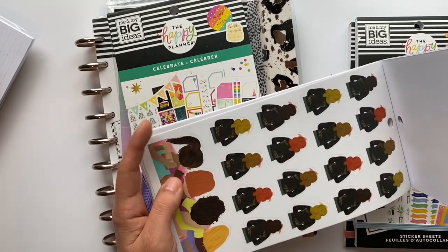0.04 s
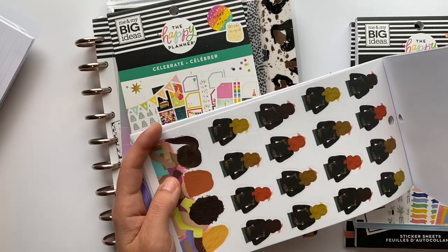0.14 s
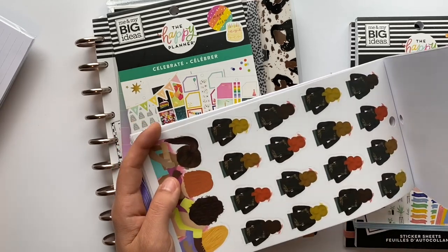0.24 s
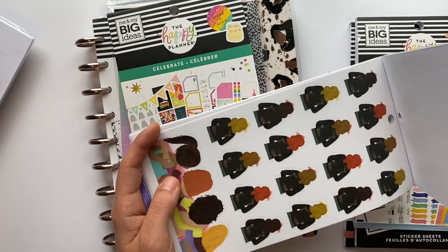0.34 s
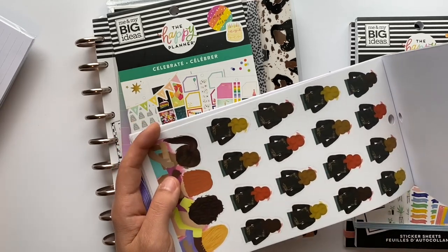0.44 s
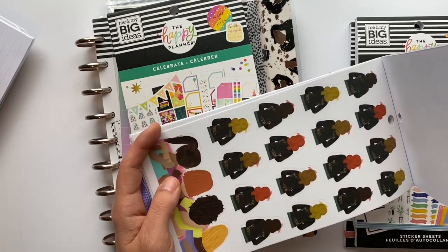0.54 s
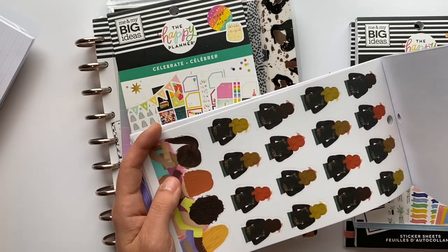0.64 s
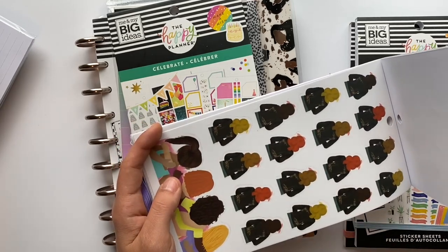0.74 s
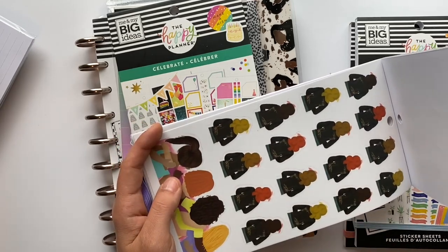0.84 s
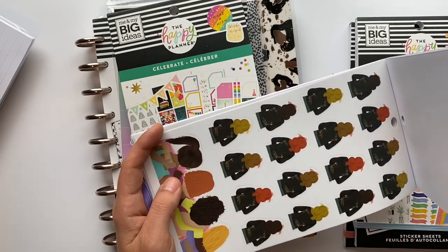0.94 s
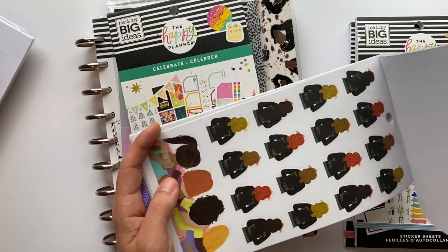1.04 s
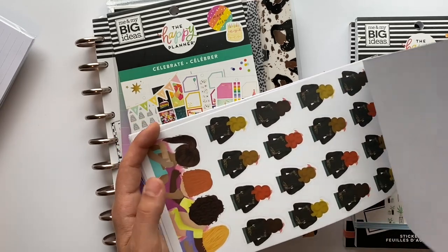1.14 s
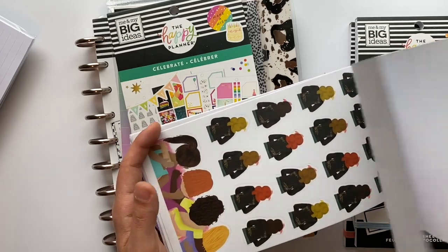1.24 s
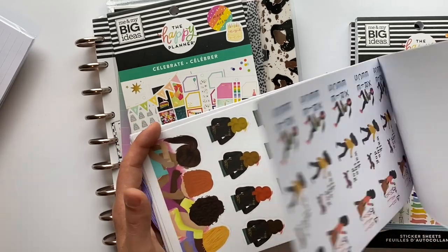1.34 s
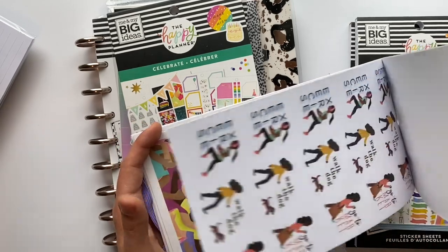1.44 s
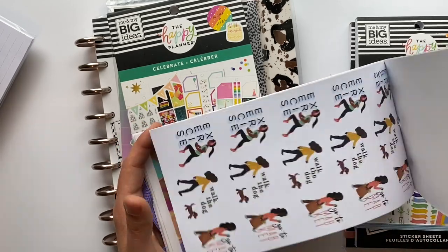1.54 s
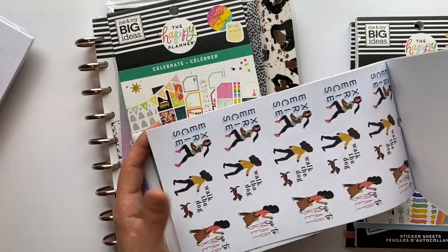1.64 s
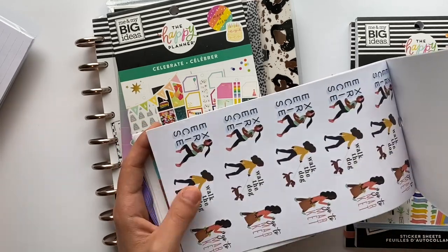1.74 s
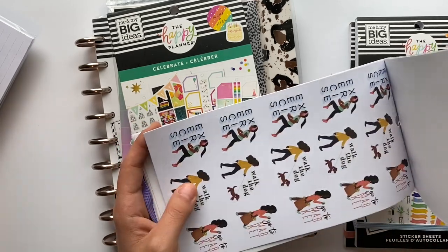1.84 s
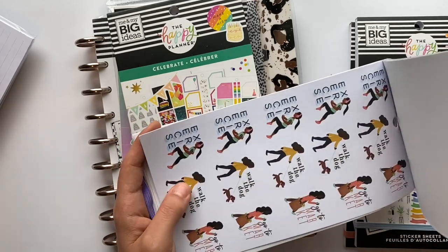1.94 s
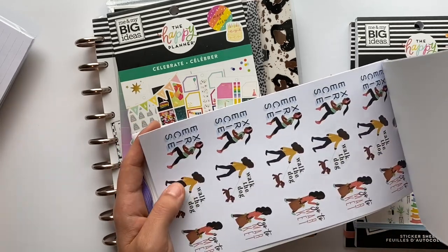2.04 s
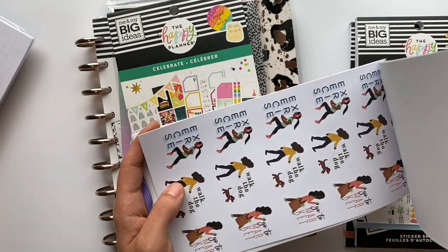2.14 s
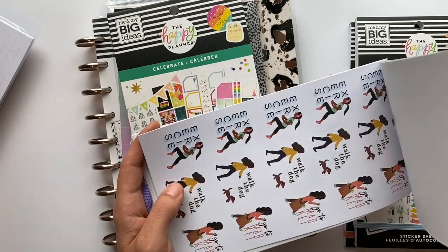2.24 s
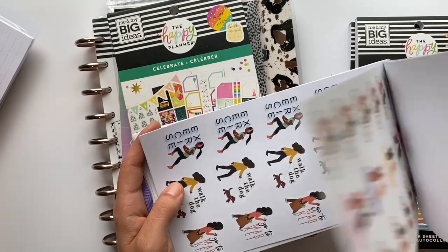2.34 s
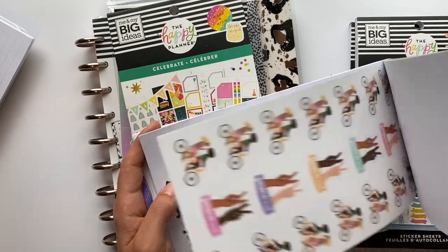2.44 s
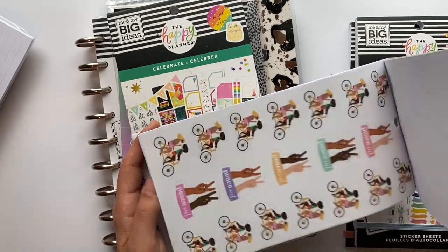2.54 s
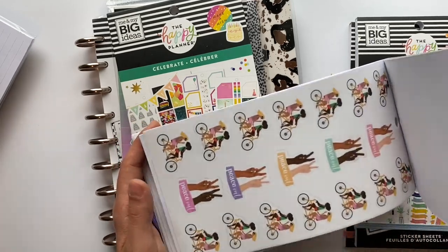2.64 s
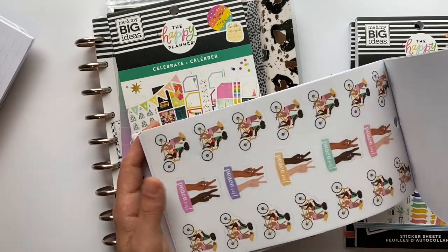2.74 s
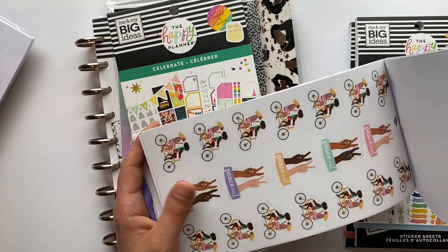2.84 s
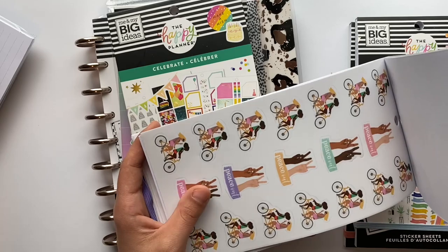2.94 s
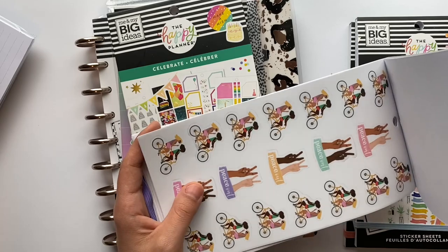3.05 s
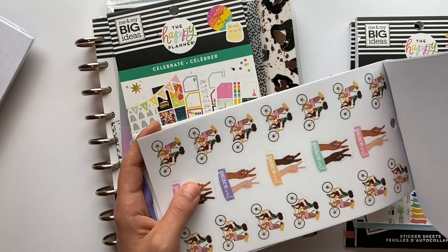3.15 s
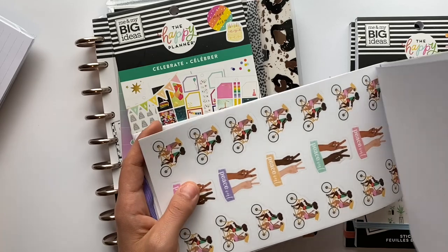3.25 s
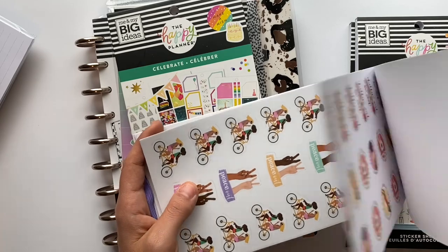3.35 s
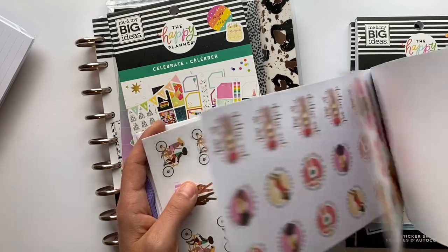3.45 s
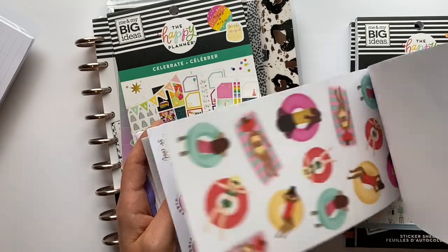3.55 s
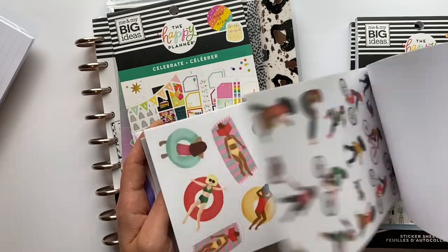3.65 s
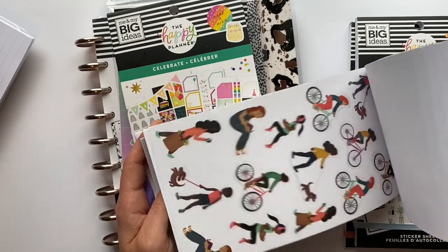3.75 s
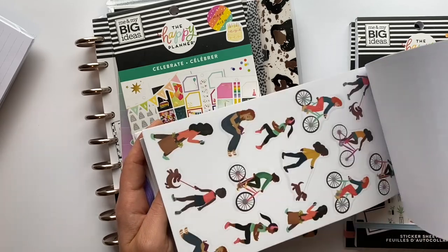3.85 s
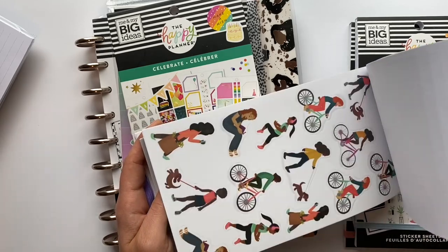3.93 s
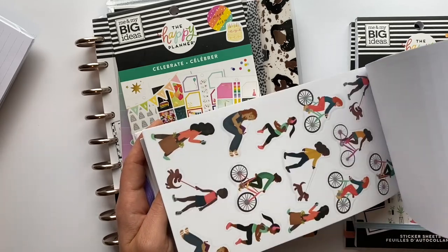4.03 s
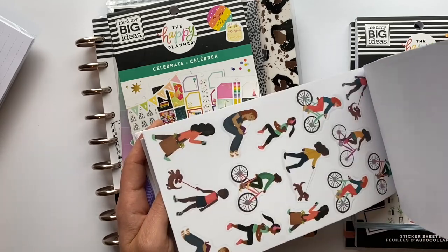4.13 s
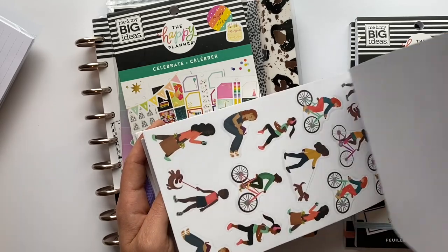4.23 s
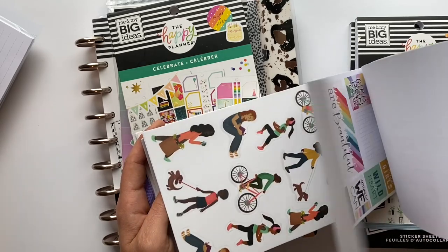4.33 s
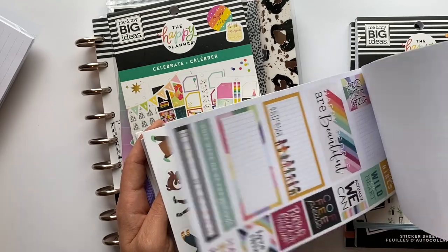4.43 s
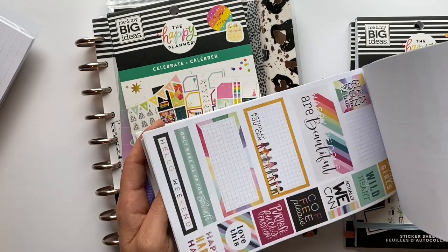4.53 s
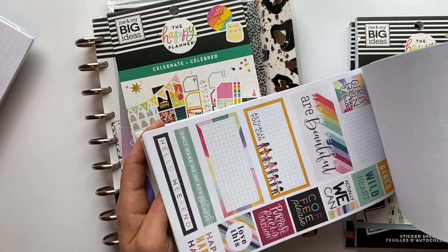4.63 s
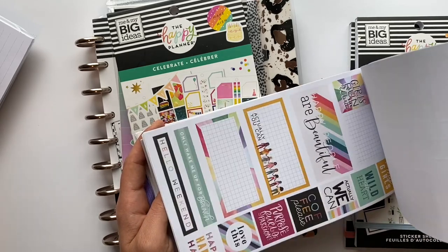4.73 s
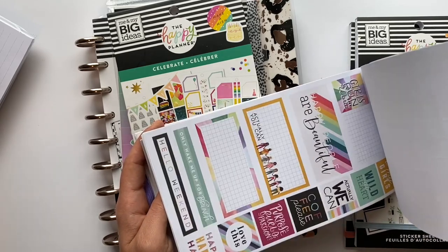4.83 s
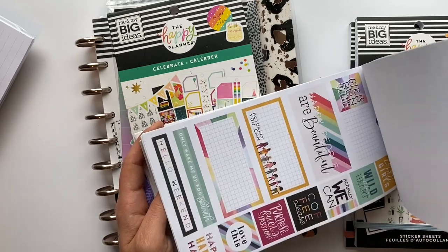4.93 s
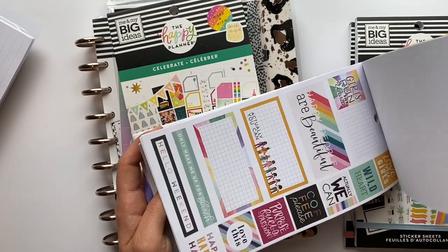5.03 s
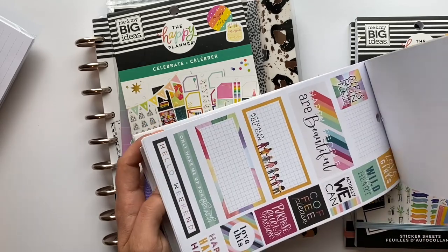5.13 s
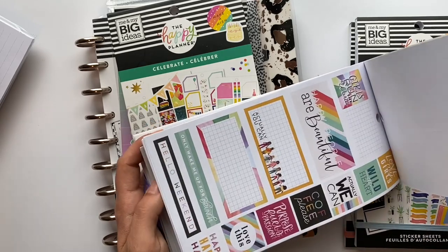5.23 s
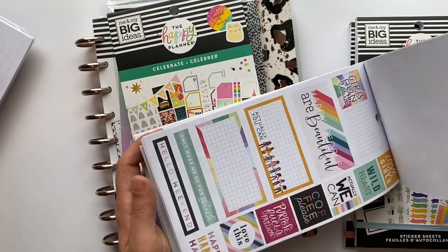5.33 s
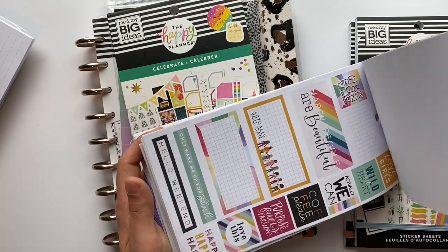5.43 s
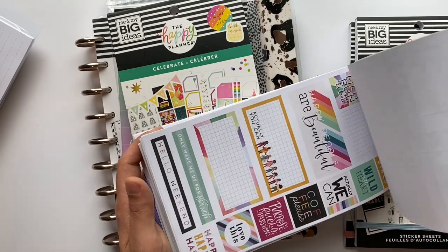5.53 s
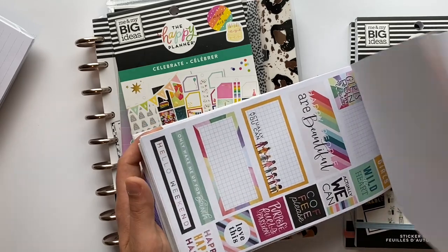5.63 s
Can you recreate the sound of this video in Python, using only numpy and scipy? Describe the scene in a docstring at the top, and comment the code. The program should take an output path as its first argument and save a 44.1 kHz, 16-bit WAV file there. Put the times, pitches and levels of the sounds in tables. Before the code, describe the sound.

Stiff glossy sticker sheets are leafed through close up, with crisp snaps and rustles, while quick dull footsteps approach across a house floor.

```python
"""Indoors, close over a pad of stiff glossy sheets, a phone hears a hand leaf through them. The sheets rub
and rustle: dense tiny slips through their resonances. Creases tick, sheets snap and buckle: short noise
bursts through resonances. Dull low bumps and shudders come from the pad, and turning pages push air at the
microphone. Quick footsteps come nearer, ringing the modes of the house floor, with faint wavering tones
from it; rumble, a faint hum and microphone hiss lie under it all."""
import sys
import numpy as np
from scipy import signal
from scipy.fft import rfft, irfft, next_fast_len
from scipy.io import wavfile
from scipy.ndimage import uniform_filter1d, map_coordinates

SR = 44100
rng = np.random.default_rng(int(sys.argv[2]) if len(sys.argv) > 2 else 0)


def unload_wav(signal):
    """Save mono or channel-first audio to the path in sys.argv[1] as 16-bit WAV at rate SR, clipped to [-1, 1]."""
    wavfile.write(
        sys.argv[1],
        SR,
        np.round(np.clip(np.atleast_2d(signal).T, -1, 1) * 32767).astype(np.int16),
    )


N = 250567


def amp(db):
    """Decibels to amplitude."""
    return 10 ** (np.asarray(db) / 20)


def unit(x):
    """x scaled to rms 1."""
    return x / np.sqrt(np.mean(x ** 2) + 1e-20)


def wobble(rate):
    """A smooth random curve, rate knots a second."""
    knots = rng.standard_normal(int(N * rate / SR) + 4)
    return map_coordinates(knots, [np.arange(N) * rate / SR])


def filtered(x, response):
    """x times a complex response of frequency."""
    m = next_fast_len(len(x) + 4096)
    f = np.fft.rfftfreq(m, 1 / SR)
    return irfft(rfft(x, m) * response(f), m)[:len(x)]


def modes(table):
    """The causal response of (Hz, width in Hz, dB) resonances, summed with alternating sign."""
    def response(f):
        total = 0
        for k, (centre, width, db) in enumerate(table):
            resonance = 1j * f * width / (centre * centre - f * f + 1j * f * width)
            total = total + (-1) ** k * amp(db) * resonance
        return total
    return response


def noise(spectrum):
    """Noise of rms 1; the spectrum's (Hz, dB) points set only its colour."""
    hz, db = np.transpose(spectrum)

    def colour(f):
        return amp(np.interp(np.log(f + 0.07), np.log(hz + 0.81), db))
    return unit(filtered(rng.standard_normal(N), colour))


def add(track, s, sound):
    """Mixes a sound into the track from time s on."""
    part = track[round(s * SR):][:len(sound)]
    part += sound[:len(part)]


# House rumble at the phone. Each row: frequency in Hz, relative density in dB per Hz.
RUMBLE = [(30, -18.5), (60, -19.5), (120, -9.5), (200, -20.5), (350, -28), (1200, -51), (2600, -120)]
# The microphone's own hiss. Each row: frequency in Hz, relative density in dB per Hz.
MIC_HISS = [(100, -48), (400, 5), (2000, -3.5), (6000, -7), (14000, -11.5), (15500, -28), (20000, -48)]
# The faint hum. Each row: frequency in Hz, mean level in dB rms.
HUM_TONES = [(97, -72), (199, -84)]


def background():
    """House rumble, a hum unsteady in level and phase, and microphone hiss."""
    t = np.arange(N) / SR
    hum = np.zeros(N)
    for hz, db in HUM_TONES:
        level = amp(db + 3 + 1.5 * wobble(6))  # + 3 dB: a sine's peak over its rms
        hum += level * np.sin(2 * np.pi * hz * t + 0.5 * wobble(5))
    rumble = amp(-76.5 + 0.17 * wobble(4.7)) * noise(RUMBLE)
    return hum + rumble + amp(-80.5) * noise(MIC_HISS)


# Slow air at the microphone. Each row: frequency in Hz, relative density in dB per Hz.
SLOW_AIR = [(1, -18.5), (3, 8.5), (8, -6.5), (20, -16.5), (50, -25), (100, -95.5), (200, -120)]
# Pushes of air from a turning page. Each row: moment of the peak in seconds, peak level in dB,
# width (standard deviation) in seconds, direction as a sign.
PAGE_PUSHES = [(2.299, -35.5, 0.02, -1), (2.367, -20, 0.0089, 1), (2.454, -23.5, 0.02, -1),
               (3.412, -30, 0.0046, -1), (3.48, -28.5, 0.019, 1), (3.576, -21, .022, -1),
               (3.672, -30.5, 0.054, 1)]


def air():
    """Slow pressure swings at the microphone, with a bell-shaped push where a page turns."""
    t = np.arange(N) / SR
    gusts_db = 2.5 * wobble(3)
    pushes = np.zeros(N)
    for s, db, width, way in PAGE_PUSHES:
        pushes += np.sign(way) * amp(db) * np.exp(-0.5 * ((t - s) / width) ** 2)
    return pushes + amp(-43.5 + gusts_db) * noise(SLOW_AIR)


# Rubbing and rustling of the sheets close under the phone; neighbouring rows may overlap into one longer
# rub. Each row, one swell: loudest moment in seconds, rise in seconds, fall in seconds, then levels in dB
# of sheet, body, 4 kHz band and treble.
RUB_SWELLS = [(0.012, 0.015, 0.092, -73.5, -78, -79.5, -86), (0.195, 0.014, 0.021, -68, -75, -75.5, -94),
              (1.638, 0.01, 0.045, -56.5, -75, -63.5, -76), (1.677, 0.04, 0.031, -64, -91, -70, -74),
              (1.75, 0.026, 0.047, -70, -78, -98, -100), (1.839, 0.014, 0.11, -59.5, -78, -71, -76),
              (1.949, 0.11, 0.073, -60.5, -86, -59.5, -70.5), (2.043, 0.03, 0.064, -68, -81, -65.5, -68.5),
              (2.084, 0.036, 0.018, -67, -95, -72.5, -71), (2.231, .01, 0.049, -70.5, -80, -69, -78),
              (2.3, 0.016, 0.11, -69, -74, -89, -69.5), (2.5, 0.065, 0.12, -72.5, -88, -76, -74.5),
              (2.566, 0.013, 0.052, -66, -59, -78, -95), (2.647, 0.036, .03, -56, -68.5, -60.5, -65.5),
              (2.702, 0.02, 0.034, -56.5, -68, -58.5, -67.5), (2.754, 0.046, 0.061, -63.5, -82, -65, -71.5),
              (3.007, 0.014, 0.1, -58.5, -72, -63.5, -66.5), (3.085, 0.024, 0.067, -67.5, -84, -82, -80),
              (3.182, 0.05, 0.087, -70, -75, -75, -76), (3.325, 0.038, 0.091, -61, -66, -70.5, -74.5),
              (3.412, 0.0085, 0.084, -75, -66, -69, -70), (3.455, 0.011, 0.035, -59.5, -74, -73, -80),
              (3.548, 0.028, 0.06, -61.5, -66, -74, -70), (3.605, 0.023, 0.11, -63, -70, -69, -76),
              (3.658, 0.026, 0.12, -64.5, -65.5, -66, -70.5),
              (3.823, 0.0078, 0.029, -49.5, -48, -56.5, -63), (3.853, .03, 0.068, -66, -69.5, -66.5, -79),
              (4.07, 0.024, 0.16, -79.5, -82, -79, -100), (4.135, 0.026, 0.12, -74.5, -65, -84, -85),
              (4.25, 0.048, 0.11, -78, -84, -88, -85), (4.468, .03, 0.09, -75.5, -80, -81.5, -83),
              (4.53, .012, .06, -73, -69, -91, -98), (4.58, 0.045, 0.05, -77, -74, -79, -92),
              (5.005, 0.013, 0.07, -72.5, -73.5, -73, -83), (5.18, 0.24, 0.41, -69.5, -79.5, -66.5, -77.5),
              (5.365, 0.046, 0.019, -70, -86, -65, -71), (5.429, 0.064, 0.098, -74, -71.5, -84, -92),
              (4.935, 0.027, 0.035, -86, -82, -80.5, -84), (0.4, 0.0095, .1, -82, -81, -79, -80),
              (5.621, 0.03, 0.05, -62, -83, -67, -70), (5.65, 0.029, 0.042, -68, -74, -74, -70)]
EDGE_DB, ROUNDNESS = 21, 1.156  # drop one rise or fall away; power of the curve (higher = flatter top)


def swells():
    """Gain of the four groups of sheet resonances: each swell rises, tops out and dies away."""
    gain = np.zeros((4, N))
    t = np.arange(N) / SR
    for s, rise, fall, *levels_db in RUB_SWELLS:
        first = max(round((s - 3.0 * rise) * SR), 0)
        span = slice(first, round((s + 3.0 * fall) * SR))
        away = np.where(t[span] < s, (s - t[span]) / rise, (t[span] - s) / fall)
        drop_db = EDGE_DB * away ** ROUNDNESS
        gain[:, span] += amp(np.array(levels_db)[:, None] - drop_db)
    return gain


def patches(x, depth_db):
    """Random gain over small areas of time and frequency: the colour of the paper keeps shifting."""
    z = signal.stft(x, nperseg=512)[2]
    over_frequency = uniform_filter1d(rng.standard_normal(z.shape), size=3, axis=0)
    field = uniform_filter1d(over_frequency, size=11, axis=1)
    return signal.istft(z * amp(depth_db * unit(field)), nperseg=512)[1][:N]


# What the sheet favours, in four groups. Each row: centre in Hz, width in Hz, relative level in dB.
LOW_RESONANCES = [(1330, 2200, -16), (1760, 214, 3.5), (2065, 430, -2.5), (2840, 640, -2)]
BODY_RESONANCES = [(392, 36, -2), (695, 102, 5)]
MID_RESONANCES = [(4015, 580, 5), (4880, 580, 3.5), (5610, 710, 0.5)]
HIGH_RESONANCES = [(7200, 7500, -4), (8960, 1370, 5.5), (12100, 8900, -12)]


def rubbing():
    """Dense tiny slips, clumped in time, sound through the resonances of the sheet."""
    grip_db = 1.8 * wobble(60) + 1.8 * wobble(300)
    groups = (LOW_RESONANCES, BODY_RESONANCES, MID_RESONANCES, HIGH_RESONANCES)  # order of the swell levels
    out = np.zeros(N)
    for gain, sheet in zip(swells(), groups):
        slips = rng.standard_normal(N) * amp(grip_db + 2.0 * rng.exponential(size=N))
        edge_hz = 0.65 * sheet[0][0]  # each group radiates little below its first resonance

        def colour(f):
            return modes(sheet)(f) * f ** 6 / (f ** 6 + edge_hz ** 6)
        out += gain * unit(patches(filtered(slips, colour), depth_db=2.9))
    return out


# Dull low bumps and shudders, about 150 to 450 Hz. Each row: start in seconds, level in dB before the
# pad's resonances and the soft rise, time to fall 60 dB in seconds.
LOW_BUMPS = [(0.031, -67, 0.16), (2.155, -78, .25), (3.23, -59, 0.12), (5.13, -65, .08),
             (5.408, -49.5, 0.22)]
# The pad on the desk, applied twice over. Each row: centre in Hz, width in Hz, level in dB per pass.
PAD_RESONANCES = [(183, 94, 0), (303, 180, -3.5)]


def bumps():
    """Noise through the pad's resonances, rising softly and dying away: a dull shudder."""
    push = np.zeros(N)
    t = np.arange(SR // 3) / SR
    for s, db, t60 in LOW_BUMPS:
        add(push, s, amp(db - 60 * t / t60) * (1 - np.exp(-t / 0.0045)))
    shudder = filtered(rng.standard_normal(N), lambda f: modes(PAD_RESONANCES)(f) ** 2)
    return push * unit(shudder)


# Footsteps through the floor. Each row: time in seconds, then levels in dB of joists, room, boards
# and knock, one for each group of floor modes.
FOOTFALLS = [(0.064, -40, -56, -58.5, -90), (0.558, -36, -51, -56, -74), (1.027, -40.5, -64, -55, -71.5),
             (1.358, -36.5, -62, -55, -62), (1.773, -43.5, -77, -50.5, -68.5),
             (2.148, -39.5, -56, -41.5, -66), (2.519, -39, -77, -50.5, -59), (2.901, -46, -39, -44.5, -59),
             (3.30, -52.5, -48, -47.5, -52), (3.696, -42.5, -33.5, -52, -53),
             (4.069, -47.5, -29.5, -29.5, -46), (4.442, -39.5, -22.5, -32.5, -42),
             (4.852, -40.5, -25, -35, -45.5), (5.232, -61, -38, -50, -52), (5.608, -38, -30.5, -36, -37)]
# The floor's modes in those four groups. Each row: frequency in Hz before a random detuning,
# relative level in dB, rise in seconds, time to fall 60 dB in seconds.
FLOOR_MODES = [
    [(24.34, 3.5, 0.03, 1)],
    [(39.44, 6, 0.0075, 0.28)],
    [(62.57, 7.5, 0.012, 0.36), (81.6, -9, 0.016, 0.21)],
    [(117.7, 10, 0.025, 0.31), (163.1, 3.5, 0.023, 0.29), (205.4, -3.5, 0.0036, 0.27)],
]
# Furniture shaken by a step. Each row: frequency in Hz, relative density in dB per Hz.
FURNITURE = [(80, -20), (200, 3), (400, -13.5), (900, -15), (1600, -34), (3000, -53)]


def footsteps():
    """A heel lands softly, the floor rings in its modes and the furniture shivers; the sole follows."""
    out, shake = np.zeros(N), np.zeros(N)
    t = np.arange(SR) / SR
    for s, *levels_db in FOOTFALLS:
        detune = rng.normal(1, 0.025, size=len(FLOOR_MODES))
        rings = []
        for level_db, ratio, group in zip(levels_db, detune, FLOOR_MODES):
            ring = np.zeros(len(t))
            for hz, db, rise, t60 in group:
                envelope = amp(level_db + db - 60 * t / t60) * (1 - np.exp(-(t / rise) ** 2))
                ring += envelope * np.sin(2 * np.pi * hz * ratio * t)
            rings.append(ring)
        above_joists = sum(rings[1:])
        add(out, s - 0.003, rings[0] + above_joists)  # heel
        add(out, s + 0.02808, 0.23 * above_joists)  # sole
        knock_db = levels_db[-1]
        add(shake, s, amp(knock_db - 11.5 - 60 * t / 0.5) * (1 - np.exp(-t / 0.036)))
    return out + shake * noise(FURNITURE)


def give_way(t60):
    """Three bursts for crease, flap and crack: strain builds for 5 ms, the crease gives way and rattles out."""
    lead = SR // 200
    t = (np.arange(SR // 12) - lead) / SR
    strain = 0.15 * np.exp(np.minimum(t, 0) / 0.0019) * (t < 0)
    life = t60 * np.array([[0.65], [0.9], [0.45]])  # crease, flap, crack
    rattle = (t >= 0) * amp(-60 * np.abs(t) / life)
    after = (t >= 0) * 0.05 * amp(-60 * t / 0.14)  # desk and walls answer
    blows = rng.standard_normal((3, len(t))) * (strain + rattle)
    blows += rng.standard_normal((3, len(t))) * after
    blows[:, lead] = 1.7  # the instant the crease gives way
    return blows


def crease(hz, breadth):
    """The ring of a crease: one resonance passed twice, breadth a share of its frequency."""
    return lambda f: modes([(hz, breadth * hz, 0)])(f) ** 2


def add_burst(track, s, t60, parts):
    """Sends each burst through its (peak dB, response) part and mixes it in around time s."""
    for blow, (level_db, shape) in zip(give_way(t60), parts):
        ring = filtered(blow, shape)
        add(track, s - 0.0043, amp(level_db) * ring / np.abs(ring).max())


# Ticks of the paper, faint to loud, each with one pitch. Each row: time in seconds, peak level in dB,
# crease frequency in Hz.
CREASE_TICKS = [(0.19, -56.5, 3230), (0.3881, -44, 8800), (1.097, -54.5, 2460), (1.1015, -47.5, 2150),
                (1.1728, -59.5, 7700), (1.2944, -47.5, 13600), (1.295, -61.5, 1850), (1.3626, -56, 4440),
                (1.369, -57, 6960), (1.5073, -59, 1690), (1.528, -44, 3570), (1.6333, -49.5, 1780),
                (1.8223, -51.5, 3300), (1.832, -66, 1720), (2.2257, -63, 1100), (2.291, -38.5, 7500),
                (2.371, -52, 4930), (2.4695, -66, 4680), (2.601, -36, 12600), (2.6844, -47.5, 1750),
                (3.1739, -53, 2010), (3.4306, -51, 1690), (3.531, -40.5, 1920), (3.5912, -46, 1510),
                (3.608, -45, 1820), (4.2172, -58, 4960), (4.2335, -51.5, 1630), (4.2642, -53, 1880),
                (4.33, -59.5, 1820), (5.005, -51.5, 1860), (5.602, -46, 11900), (5.6211, -47.5, 1690)]


def ticks():
    """A tick only rings its crease."""
    out = np.zeros(N)
    for s, db, hz in CREASE_TICKS:
        add_burst(out, s, 0.0069, [(db, crease(hz, 0.92))])
    return out


# Snaps of buckling paper. Each row: time in seconds, crease peak in dB, crease frequency in Hz,
# breadth as a share of that frequency, flap peak in dB, flap frequency in Hz, crack peak in dB.
PAPER_SNAPS = [(0.388, -46.5, 1790, 1, -48.5, 413, -45), (1.425, -54.5, 1065, 0.47, -57, 327, -84),
               (1.5268, -39, 1830, 0.36, -63.5, 700, -55), (1.6057, -51, 1600, 0.38, -57, 357, -63),
               (2.0342, -54, 2060, 0.21, -63.5, 720, -67), (2.2893, -47, 2380, 0.22, -36.5, 413, -37),
               (2.534, -28.5, 1530, 0.37, -71, 331, -63), (2.558, -47, 1800, 0.4, -50.5, 322, -70),
               (2.5655, -48.5, 1350, 0.24, -37, 734, -72), (2.6, -29.5, 2100, 0.85, -69, 890, -35.5),
               (2.9917, -50, 1750, 1, -58, 674, -73), (3.0783, -63, 2320, .62, -48.5, 405, -47.5),
               (3.3047, -55.5, 1150, 0.74, -57, 410, -54), (3.3276, -47, 2000, 0.54, -59, 690, -48),
               (3.3487, -59, 1180, 0.3, -56, 331, -59), (3.4012, -31.5, 3080, 0.99, -36.5, 436, -37.5),
               (3.4505, -41, 2030, .64, -59, 331, -51), (3.57, -51, 1670, 0.33, -35, 348, -32),
               (3.6464, -37, 1840, 0.66, -40, 890, -32), (3.8118, -44, 1720, 0.66, -54, 677, -44.5),
               (3.8157, -34.5, 1800, 0.47, -39, 690, -43), (3.82, -37, 1760, 0.47, -37.5, 711, -47),
               (4.0117, -62, 1120, .9, -54, 404, -63), (4.132, -64, 1320, .36, -50.5, 330, -43.5),
               (4.5177, -39.5, 1210, 0.39, -45, 700, -92), (4.5199, -47, 1950, 0.14, -49.5, 595, -96),
               (5.368, -51, 2060, 1, -58, 325, -59), (5.3933, -56, 1500, 0.96, -52, 324, -70),
               (5.601, -43.5, 4680, 0.19, -44, 355, -47), (5.6371, -35.5, 4030, 0.44, -56, 700, -67)]
CRACK_HZ = 5190


def crack(f):
    """The broad bright crack of the sheet, tilted towards the treble."""
    return crease(CRACK_HZ, 1.2)(f) * f / (f + CRACK_HZ)


def page_flap(hz):
    """Two resonances of a flapping page; a whole page moves too slowly for treble."""
    flap = modes([(hz, 260, 0), (0.25 * hz, 160, -3)])
    return lambda f: flap(f) / (1 + 1j * f / 2500)


def snaps():
    """A snap rings its crease, flaps the page and cracks."""
    out = np.zeros(N)
    for s, db, hz, breadth, flap_db, flap_hz, crack_db in PAPER_SNAPS:
        parts = [(db, crease(hz, breadth)), (flap_db, page_flap(flap_hz)), (crack_db, crack)]
        add_burst(out, s, 0.014, parts)
    return out


# Short faint tones from the floor. Each row: start in seconds, length in seconds, frequency in Hz,
# peak level in dB.
FLOOR_TONES = [(2.802, 0.09, 616, -77.5), (4.201, .12, 532, -72), (4.304, 0.084, 614, -75.5),
               (4.722, 0.16, 670, -77.5), (5.011, 0.072, 621, -71)]


def creaks():
    """Faint tones that swell and fade, their pitch wavering 13 times a second."""
    out = np.zeros(N)
    for s, length, hz, db in FLOOR_TONES:
        t = np.arange(round(length * SR)) / SR
        swell = np.sin(np.pi * t / length)
        waver = np.sin(2 * np.pi * 13 * t)
        add(out, s, amp(db) * swell * np.sin(2 * np.pi * hz * t + waver))
    return out


def scene():
    """Everything that reaches the phone, as one channel."""
    pad = rubbing() + ticks() + snaps() + bumps()
    floor = footsteps() + creaks()
    house = air() + background()
    return (pad + floor + house)[None]


def record(dry):
    """The microphone fades at the very top and the phone keeps nothing above its band limit."""
    def response(hz):
        fade_db = -9 * np.clip((hz - 15000) / 900, 0, 1)
        return (hz < 16450) * amp(fade_db)
    return filtered(dry[0], response)[None]


dry = scene()
out = record(dry)
unload_wav(out)
```